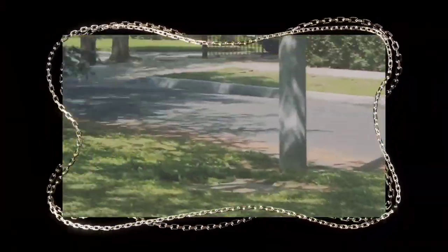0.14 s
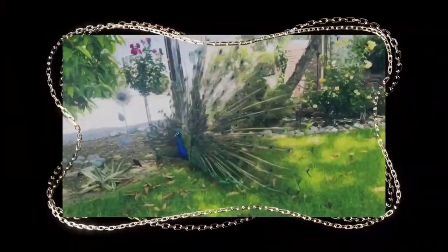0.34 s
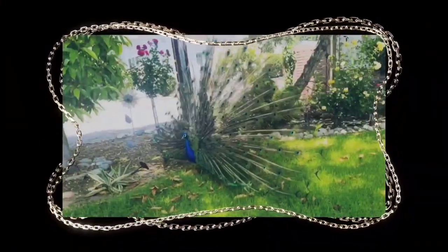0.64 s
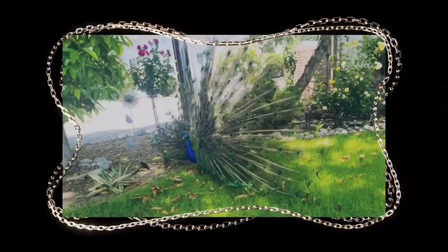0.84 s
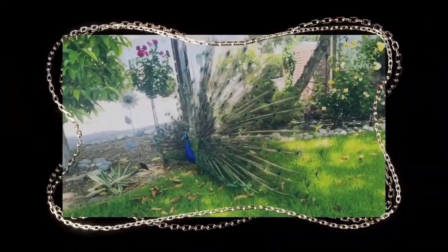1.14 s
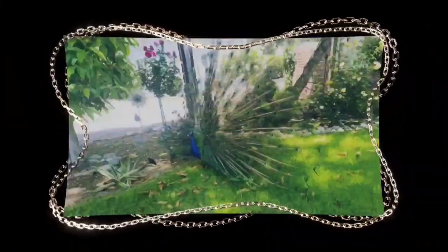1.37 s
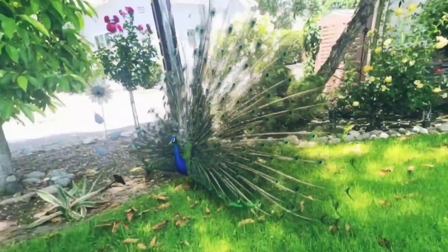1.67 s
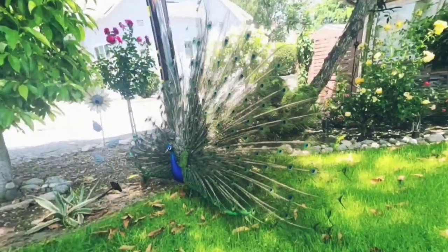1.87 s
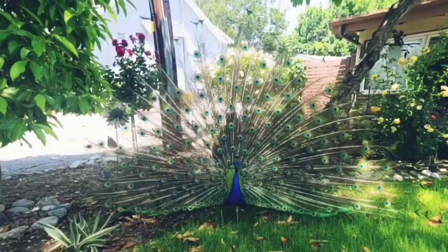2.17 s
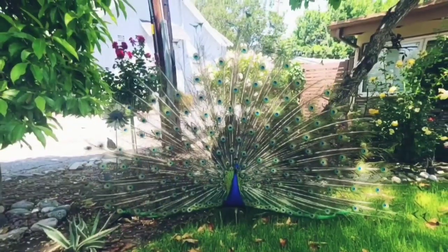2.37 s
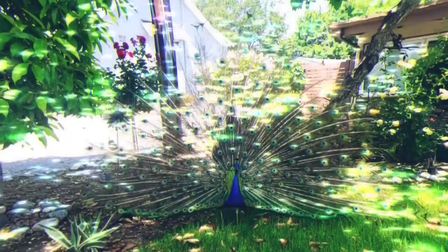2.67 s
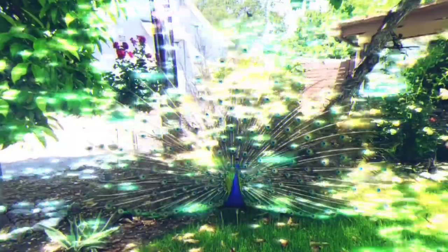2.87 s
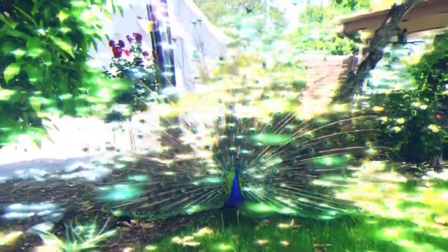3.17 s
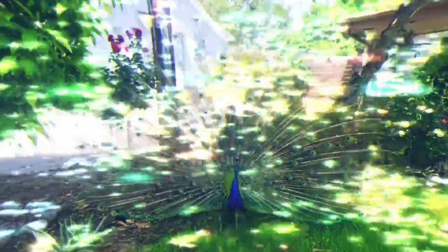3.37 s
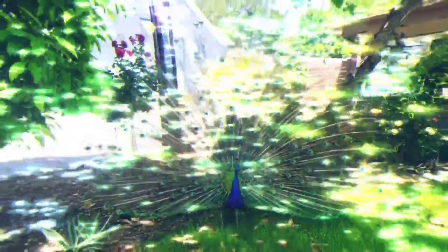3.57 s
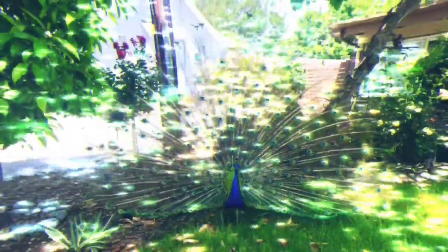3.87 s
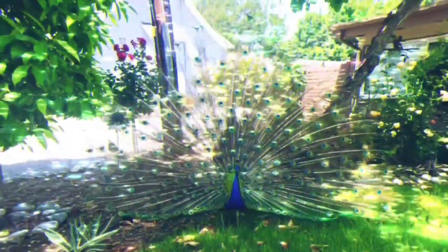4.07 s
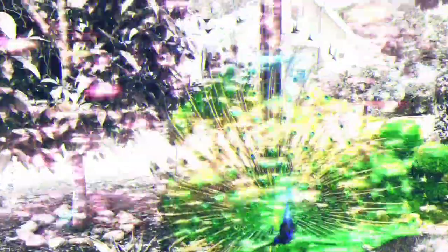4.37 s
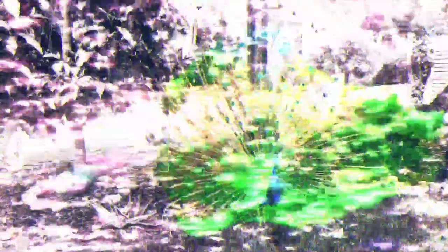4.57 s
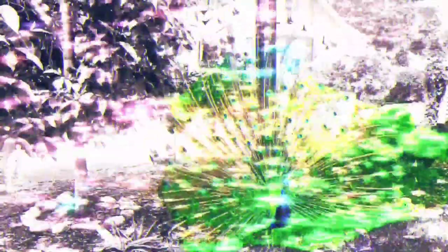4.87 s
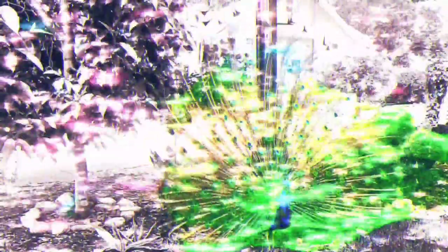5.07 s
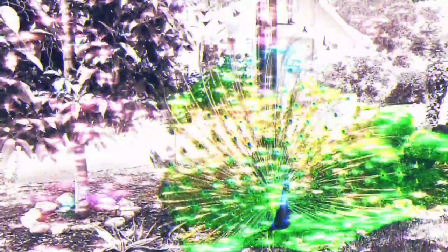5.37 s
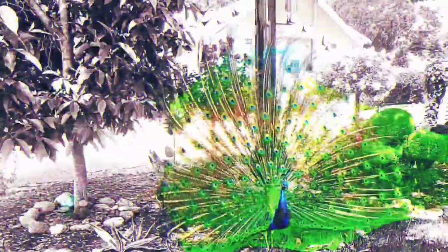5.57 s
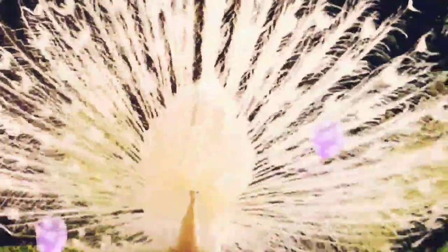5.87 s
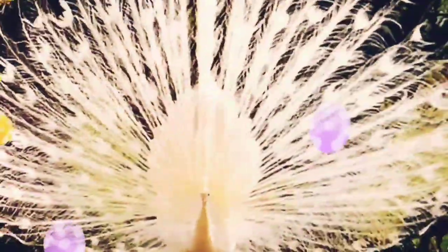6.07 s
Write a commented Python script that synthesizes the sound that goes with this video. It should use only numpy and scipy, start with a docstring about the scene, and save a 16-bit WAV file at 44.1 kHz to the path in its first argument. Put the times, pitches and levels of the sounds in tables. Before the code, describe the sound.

Two peacocks wail in turn across a leafy park, nasal calls rising and falling and overlapping, over soft hiss, bumps and faint bird chirps.

```python
"""Two peacocks wail in turn across a park: stacked partials follow each pitch curve, and calls overlap.
Their echoes from far trees are a filtered noise tail. Behind lie a steady outdoor hiss and a flickering
band near 3 kHz, both shaped noise. At the start a gust, two-channel rumble, shakes the microphone and a
clink of ringing modes sounds on the right. Fingers bump (gliding sines) and tick (noise bursts) on its
case, and a small songbird whistles short bending notes."""
import sys
import numpy as np
from scipy import signal
from scipy.fft import rfft, irfft
from scipy.io import wavfile
from scipy.ndimage import uniform_filter1d

SR = 44100
rng = np.random.default_rng(int(sys.argv[2]) if len(sys.argv) > 2 else 0)


def wav_record(signal):
    """Record a signal, one row per channel, as 16-bit PCM in the file named by sys.argv[1]."""
    frames = np.transpose(np.atleast_2d(signal))
    bounded = np.clip(frames, -1, 1)
    # unit amplitude maps onto the largest positive 16-bit level
    quanta = np.round(bounded * 32767).astype(np.int16)
    wavfile.write(sys.argv[1], SR, quanta)


N = 274958  # samples

# Wind level over time. Each row: time in seconds, level in dB before the common lift in gust().
GUST_LEVEL = [(0, -35), (0.051, -27.5), (.1, -34.5), (.14, -28), (.2, -36.5), (0.264, -37), (0.291, -47)]
# Relative spectrum of the wind rumble. Each row: frequency in Hz, density in dB per Hz.
GUST_COLOUR = [(20, -4), (70, 13.5), (300, -9), (1500, -36), (3000, -51), (15000, -48)]
# Relative spectrum of the outdoor hiss. Each row: frequency in Hz, density in dB per Hz.
HISS_COLOUR = [(20, 7), (60, -15.5), (300, -22), (800, -10.5), (1600, -14.5), (2800, -14.5), (4500, -22),
               (6000, -25.5), (7200, -7), (7900, -28.5), (8400, -41.5), (15000, -42)]
HISS_DB = -52.5  # rms
# Relative spectrum of the hiss band near 3 kHz. Each row: frequency in Hz, density in dB per Hz.
SIZZLE_COLOUR = [(2300, -33.5), (2950, 2.5), (3600, -22.5)]
SIZZLE_DB, SIZZLE_END_S, SIZZLE_FADE_S = -50.5, 1.98, 1  # level; the fade is halfway at the end time

# One curve a wail, the two birds overlapping. Each row: time in seconds, pitch in Hz, effort in dB,
# beak opening as 3rd over 2nd partial in dB, upper partials over effort in dB.
WAILS = [
    [(0.03, 532, -37, 1.5, -11), (0.1, 582, -35.5, 11, -13), (0.17, 630, -26, 2.5, -7),
     (0.25, 635.9, -22.5, 4.5, -7), (0.42, 630.7, -26.5, 0, -10.5), (0.56, 646, -28, -6.5, -6.5),
     (0.62, 630, -26.5, -9, -14.5), (0.7, 580, -34, 0, -17), (0.78, 531, -49, -1, -33)],
    [(1.24, 624, -30, -16.5, -31), (1.295, 710, -25, -19.5, -34.5), (1.33, 713, -18.5, -34, -17),
     (1.41, 707.6, -29.5, -34, -13), (1.47, 699.5, -24, -21.5, -21), (1.55, 625.4, -36, -4.5, -19.5),
     (1.64, 522, -49, -21.5, -28)],
    [(2.19, 545.5, -51, -1, -34), (2.26, 570.6, -33.5, 8.5, -14), (2.34, 600, -38, 8, -7),
     (2.57, 626.4, -29.5, -6, -7), (2.69, 615.5, -34, -15, -9), (2.79, 569.5, -40, -7, -4),
     (2.88, 509, -52, 2, -15)],
    [(2.36, 627.6, -34, 6.5, 6), (2.43, 655.4, -33.5, 6.5, -16.5), (2.64, 663, -30.5, 8.5, -13.5),
     (2.75, 686.8, -25.5, -23.5, -14), (2.9, 681.2, -25.5, -18.5, -26.5), (3.0, 660.4, -29, -12, -14),
     (3.09, 624, -31.5, -5, -13), (3.15, 534, -55, 2.5, -22)],
    [(3.54, 537, -39, 7, 0), (3.6, 601, -38, 6.5, -6), (3.65, 630, -32.5, 7, -3.5),
     (3.92, 654, -24.5, -9.5, -10.5), (4.05, 652, -29.5, -5.5, -15), (4.17, 595.3, -37.5, -13, -17.5),
     (4.255, 530, -47, -4.5, -17.5)],
    [(3.76, 572.9, -40.5, 3, -17), (3.82, 636.9, -33, 16.5, -12.5), (3.85, 645.8, -26, -9.5, -18),
     (3.9, 652.0, -29.5, 16, -20), (4.14, 657, -29, 4.5, -12.5), (4.29, 685, -24.5, -26.5, -18.5),
     (4.42, 675, -26.5, -23.5, -17), (4.6, 621.5, -31.5, -10.5, -9.5), (4.69, 533.5, -49, -4.5, -10.5)],
    [(4.94, 530, -43.5, 6, -8), (5.01, 601, -40, 3.5, -9), (5.09, 639.8, -30, 3.5, -10.5),
     (5.4, 642, -29.5, 0.5, -10.5), (5.52, 628.2, -27, -28.5, -15.5), (5.6, 610, -35.5, -8, -12),
     (5.67, 543, -47, -7.5, -18)],
    [(5.33, 556.4, -40, 2.5, -17), (5.4, 622.7, -32.5, 11.5, -19.5), (5.45, 636, -31.5, 24.5, -21),
     (5.62, 626, -33, 23.5, -15), (5.8, 620, -30.5, 10.5, -12.5), (5.87, 597, -33.5, 9, -24.5),
     (5.93, 521.6, -49.5, 4.5, -18)],
]
# How the head is turned, one row a wail. Each row: 4th partial in dB, 5th partial in dB,
# hollow in the upper colour in dB (a positive value lifts), hollow centre in Hz.
HEAD_TURNS = [(6, 8, -10, 3790), (-5.5, 1, 3.5, 5580), (-2.5, -1, -8, 4680), (0, -0.5, 2.5, 4460),
              (-0.5, -0.5, -7.5, 3800), (3.5, -9, -2, 5350), (4, -4.5, 1.5, 3500), (-3.5, 0.5, -5.5, 4100)]
# Colour of the upper partials through throat and beak. Each row: frequency in Hz, gain in dB.
THROAT = [(2600, 6.5), (3200, -8), (4000, -13.5), (5250, -9.5), (5800, -4), (6400, -5), (7000, -3.5),
          (7700, -14), (8200, -37.5), (11000, -53.5)]
# Throat colour met by the 4th partial. Each row: frequency in Hz, level over effort in dB.
FOURTH_COLOUR = [(2100, -6.5), (2400, -12.5), (2580, -9.5), (2720, -3.5)]
# The voice cracks in the first wail, cycles alternating in fours; the last depth stays for later wails.
# Each row: scene time in seconds, crack depth from 0 to 1.
CRACK = [(.28, 0.04), (.47, 0.25), (.62, 0.79), (.78, 0.05)]
FUNDAMENTAL_DB = -39  # 1st partial over the mean of effort and 2nd partial
HOLLOW_PER_BEAK, FOURTH_PER_BEAK = 0.5, 0.52  # dB per dB of beak opening
OPENING_S = 0.032  # the upper partials enter this long after the start

# Echo decay by band. Each row: frequency in Hz, time to fall 60 dB in seconds.
PARK_DECAY = [(1300, 1.366), (2000, 1.01), (3000, 0.91), (6000, 0.78)]
# Colour of the echoes. Each row: frequency in Hz, gain in dB.
PARK_COLOUR = [(1000, 5), (1500, -4), (2000, -3), (3800, 6), (6000, 1)]

# Ringing modes of small metal parts. Each row: frequency in Hz, relative level in dB,
# time to fall 60 dB in seconds.
CLINK_MODES = [(5300, -1, .03), (8300, -14, .03), (11400, -4, 0.025), (13800, -11, 0.07)]
CLINK_S, CLINK_DB = 0.185, -27.5  # time; level drive on the right

# Bumps on the case. Each row: time in seconds, relative level in dB, frequency before its glide in Hz.
BUMPS = [(1.023, -44.5, 253), (1.133, -38.5, 267), (1.166, -37, 370), (1.225, -33.5, 197),
         (1.357, -47.5, 247.5), (1.592, -45.5, 400), (1.655, -34.5, 414), (1.69, -39, 390),
         (1.795, -48, 354), (2.023, -52, 174), (2.176, -47.5, 179)]
# Ticks and brushes on the case. Each row: centre in seconds, relative level in dB,
# treble tilt in dB (weighted 3 at 7.5 kHz, 4 at 16 kHz), decay either side in seconds.
TICKS = [(1.238, -45, 2, 0.0012), (2.4007, -22, -5, 0.002), (2.414, -50, 4, 0.0016),
         (6.119, -46, -3.5, 0.016), (6.196, -49, -13, 0.028)]
# Songbird notes. Each row: start in seconds, length in seconds, start pitch in Hz, middle pitch in Hz,
# end pitch in Hz, level in dB.
SONG = [(1.336, 0.089, 4740, 4030, 3660, -47), (1.693, 0.037, 3095, 2780, 2730, -42.5),
        (1.798, 0.024, 2640, 2330, 2900, -46), (1.923, 0.026, 2960, 2710, 2290, -41),
        (2.041, 0.026, 2420, 2716, 2970, -43), (2.072, 0.041, 2670, 2570, 2540, -40),
        (2.185, 0.028, 3040, 2660, 2330, -41), (2.311, 0.043, 3150, 2860, 2350, -37)]

EDGE_HZ = 15750


def gain_of(db):
    """Decibels to a factor."""
    return 10 ** (np.asarray(db) / 20)


def evened(x):
    """Scales to rms 1."""
    return x / np.sqrt(np.mean(x ** 2) + 1e-20)


def read(points, hz):
    """Value of a spectrum at hz, interpolated along log frequency."""
    f, value = np.transpose(points)
    return np.interp(np.log(hz + 1), np.log(f + 1), value)


def add(mix, s, sound):
    """Mixes a sound in from second s."""
    part = mix[round(s * SR):][:len(sound)]
    part += sound[:len(part)]


def coloured(x, points):
    """Filters by a spectrum."""
    hz = np.fft.rfftfreq(x.shape[-1], 1 / SR)
    return irfft(rfft(x) * gain_of(read(points, hz)), x.shape[-1])


def drift(length, span):
    """Smooth random motion of rms 1, steady over about span samples."""
    smooth = uniform_filter1d(rng.standard_normal(length), span)
    return evened(uniform_filter1d(smooth, span))


def gust():
    """Lumpy wind rumble, independent noise in the two channels, cut off within 9 ms."""
    s, db = np.transpose(GUST_LEVEL)
    t = np.arange(round(s[-1] * SR)) / SR
    rumble = evened(coloured(rng.standard_normal((2, len(t))), GUST_COLOUR))
    level = gain_of(np.interp(t, s, db) + 6.5)
    cutoff = np.clip((s[-1] - t) / 0.0088, 0, 1)
    return np.pad(rumble * level * cutoff, ((0, 0), (0, N - len(t))))


def hiss(patchy_db=-1.0, swell_db=.6):
    """Distant leaves, insects and traffic: random spectra with drifting patches."""
    frames, hz = N // 256 + 5, np.fft.rfftfreq(1024, 1 / SR)
    real, imaginary, patches = rng.standard_normal((frames, 513, 3)).T
    patches = uniform_filter1d(patches, 12, 0)  # blurred across frequency bins
    patches = evened(uniform_filter1d(patches, 14, 1))  # and across frames
    level_db = read(HISS_COLOUR, hz)[:, None] + patchy_db * patches + swell_db * drift(frames, 40)
    spectra = (real + 1j * imaginary) * gain_of(level_db)
    noise = signal.istft(spectra, nperseg=1024, noverlap=768)[1][:N]
    return gain_of(HISS_DB) * evened(noise)


def sizzle(flicker_db=3.5):
    """A narrow band of noise whose level flickers at random while it fades away slowly."""
    fade = 1 / (1 + np.exp((np.arange(N) / SR - SIZZLE_END_S) / SIZZLE_FADE_S))
    band = [(20, -90)] + SIZZLE_COLOUR + [(20000, -90)]
    noise = evened(coloured(rng.standard_normal(N), band))
    return gain_of(SIZZLE_DB + flicker_db * drift(N, 900)) * fade * noise


def partial_sum(levels_db, angle):
    """Adds harmonics of one phase angle, each with its own level and phase offset."""
    return sum(gain_of(db) * np.cos((k + 1) * angle + 0.78 * k * k) for k, db in enumerate(levels_db))


def wail(rows, fourth_db, fifth_db, hollow_db, hollow_hz, wobble=0.001, flutter_db=0.5):
    """Nearly clean partials; the level of each high one wavers at random, more in fast glides."""
    s, *columns = np.transpose(rows)
    t = np.arange(s[0], s[-1], 1 / SR)
    hz, effort_db, beak_db, upper_db = (np.interp(t, s, c) for c in columns)
    hz = uniform_filter1d(hz, 2000, mode="nearest")  # the pitch turns its corners gently
    unsteady = wobble * (1 + abs(np.gradient(hz)) * SR / 500)  # fast glides are less steady
    angle = 2 * np.pi * np.cumsum(hz * (1 + unsteady * drift(len(t), 300))) / SR

    second_db = effort_db - 10 * np.log10(1 + gain_of(2 * beak_db))  # 2nd and 3rd share the effort
    first_db = (effort_db + second_db) / 2 + FUNDAMENTAL_DB
    fourth_db = fourth_db + effort_db + read(FOURTH_COLOUR, 4 * hz) + FOURTH_PER_BEAK * beak_db
    levels_db = [first_db, second_db, second_db + beak_db, fourth_db]

    opening_db = -30 / (1 + np.exp((t - s[0] - OPENING_S) / 0.0034))
    hollow_depth_db = hollow_db + HOLLOW_PER_BEAK * beak_db
    for k in range(5, 18):
        share = min((k - 3) / 5, 1)  # the level passes from the 4th partial to the upper curve
        base_db = share * (effort_db + upper_db) + (1 - share) * fourth_db
        hollow = hollow_depth_db * np.exp(-((k * hz - hollow_hz) / 800) ** 2)
        colour_db = read(THROAT, k * hz) + hollow
        waver = np.sqrt(unsteady / wobble) * np.minimum(drift(len(t), 2400), 1)
        levels_db.append(base_db + colour_db + 0.9 * opening_db + flutter_db * (k - 1.5) * waver)
    levels_db[4] += fifth_db

    depth = np.interp(t, *np.transpose(CRACK))
    angle_cracked = angle + 0.5 * depth * np.sin(angle / 4 + 2.0)  # cycle lengths alternate too
    clean = partial_sum(levels_db, angle)
    bent = partial_sum(levels_db, angle_cracked)
    pattern = 1 + depth * (np.cos(angle / 4) + 0.9 * np.cos(angle / 2))  # repeats every four cycles
    # the throat favours the line just above the 2nd partial
    crack_colour = [(1000, -43.0), (1170, -5.0), (1440, 9.0), (1640, -3.5), (5500, -4), (7500, -11.5)]
    crack = coloured(bent * pattern - clean, crack_colour)
    edges = np.clip(np.minimum(t - s[0] + .002, s[-1] - t) / 0.016, 0, 1)
    return np.sqrt(2) * (clean + crack) * edges


def park(x, steady_db=-9, late_db=-1.5, late_s=0.34, late_spread_s=1.0):
    """Dense echoes dying band by band, the late part fading a little more slowly."""
    hz, t, noise = signal.stft(rng.standard_normal(2 * SR), SR, nperseg=256)
    decay = gain_of(-60 * t / read(PARK_DECAY, hz)[:, None]) * np.clip(t / 0.005, 0, 1)
    late = 1 / (1 + np.exp((late_s - t) / late_spread_s * 4))
    strength = gain_of(steady_db) + gain_of(late_db) * late
    tail = signal.istft(noise * decay * strength, SR, nperseg=256)[1]
    return signal.fftconvolve(coloured(x, PARK_COLOUR), tail / np.sqrt(SR / 12))[:N]


def clink(knock_s=.004, jingle_s=0.032, jingle_db=-14):
    """Small metal parts: a noise knock inside a short jingle rings high modes, louder on the right."""
    out, t = np.zeros((2, N)), np.arange(4096) / SR
    modes = sum(gain_of(db - 60 * t / t60) * np.sin(2 * np.pi * hz * t + 1) for hz, db, t60 in CLINK_MODES)
    off = abs(t - t.mean())
    knock = np.exp(-off / knock_s)
    jingle = gain_of(jingle_db) * np.exp(-off / jingle_s)
    shaking = (knock + jingle) * np.hanning(len(t)) / 10
    for side, side_db in zip(out, (-9, 0)):  # left, right
        ringing = np.convolve(modes, shaking * rng.standard_normal(len(t)))
        add(side, CLINK_S - t.mean(), gain_of(CLINK_DB + side_db) * ringing)
    return out


def hands(cycles=2.3):
    """Soft low bumps as gliding sines; ticks and brushes as noise, reaching lower the longer they last."""
    out = np.zeros(N)
    chances = rng.uniform(-1.44, 1, (len(BUMPS), 2))
    for (s, db, hz), (glide, phase) in zip(BUMPS, chances):
        u = np.linspace(0, 1, round((0.066 + cycles / hz) * SR))
        rough = 1.05 + drift(len(u), 110)
        ring = np.sin(2 * np.pi * np.cumsum(hz * (1 + 0.4 * glide * u)) / SR + 3 * phase)
        swell = np.sin(np.pi * u ** 0.39) ** 2 / 2  # quick rise, slow fall
        add(out, s - .012, gain_of(db) * ring * rough * swell)

    t = np.arange(-2048, 2048) / SR
    for s, db, tilt_db, length in TICKS:
        burst = evened(rng.standard_normal(len(t)) * np.exp(-abs(t) / length))
        burst = burst * np.sqrt(length * SR / len(t))
        colour = [(150, -58), (300, -45 + 2000 * length), (1100, 12.0),
                  (7500, 3 * tilt_db), (16000, 4 * tilt_db - 25)]
        add(out, s + t[0], gain_of(db) * coloured(burst, colour))
    return out


def songbird(blur=.3):
    """Short sine notes bend through three pitches; random level motion makes them slightly husky."""
    out = np.zeros(N)
    for s, length, start_hz, middle_hz, end_hz, db in SONG:
        u = np.linspace(0, 1, round(length * SR))
        bend = np.polyfit([0, .5, 1], [start_hz, middle_hz, end_hz], 2)
        hz = np.polyval(bend, u)
        husk = 1 + blur * drift(len(u), 90)
        whistle = np.sin(2 * np.pi * np.cumsum(hz) / SR)
        add(out, s, gain_of(db) * whistle * np.sin(np.pi * u) * husk)
    return out


def scene():
    """Birds, echoes, hands and hisses in the middle; only gust and clink are wide."""
    birds = songbird()
    for rows, head in zip(WAILS, HEAD_TURNS):
        add(birds, rows[0][0], wail(rows, *head))
    return birds + park(birds) + hands() + hiss() + sizzle() + gust() + clink()


def record(dry):
    """The band limit: a steep low-pass filter."""
    lowpass = signal.firwin(1535, EDGE_HZ, window=("kaiser", 9), fs=SR)
    return signal.oaconvolve(dry, lowpass[None], "same")


dry = scene()
out = record(dry)
wav_record(out)
```